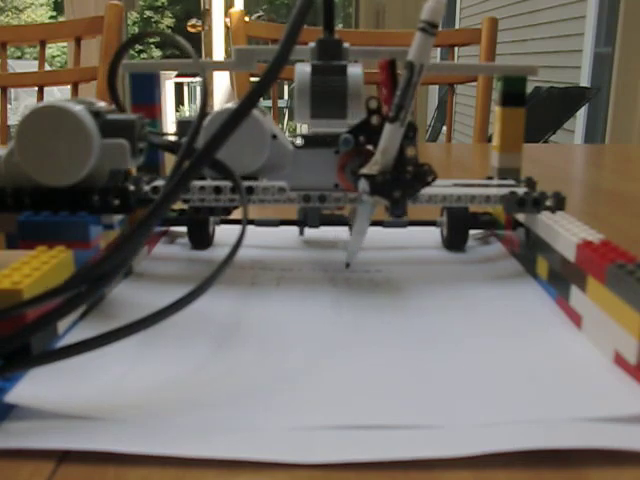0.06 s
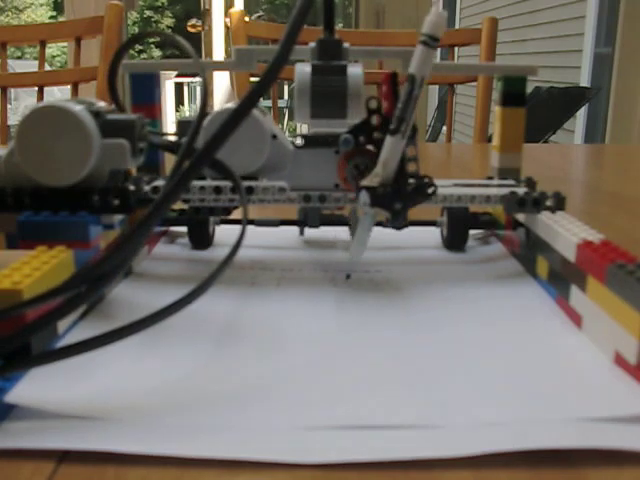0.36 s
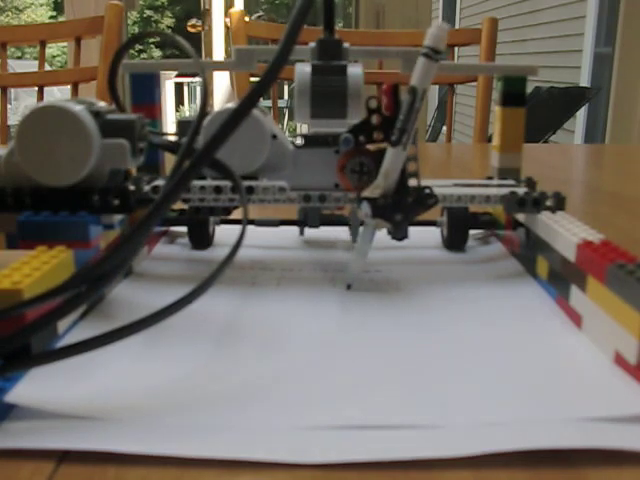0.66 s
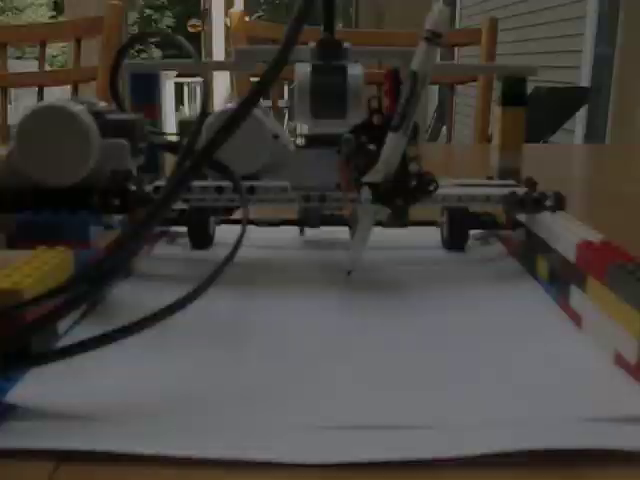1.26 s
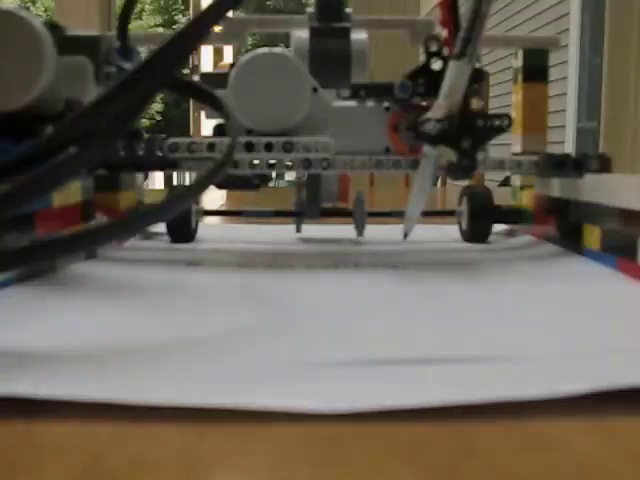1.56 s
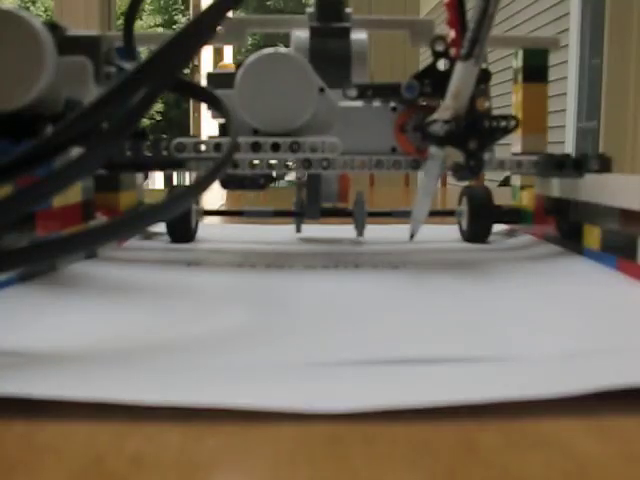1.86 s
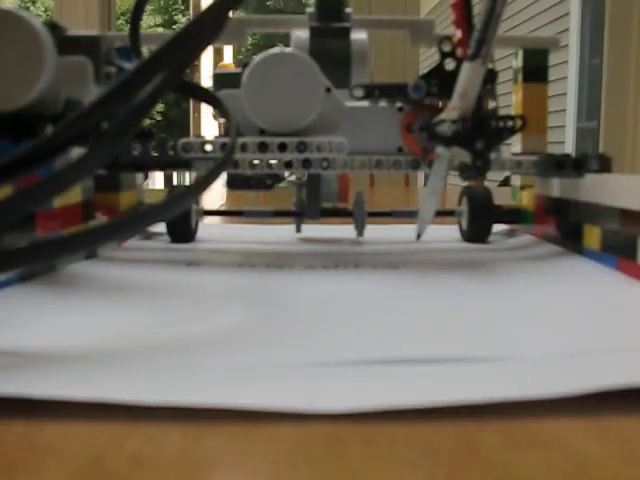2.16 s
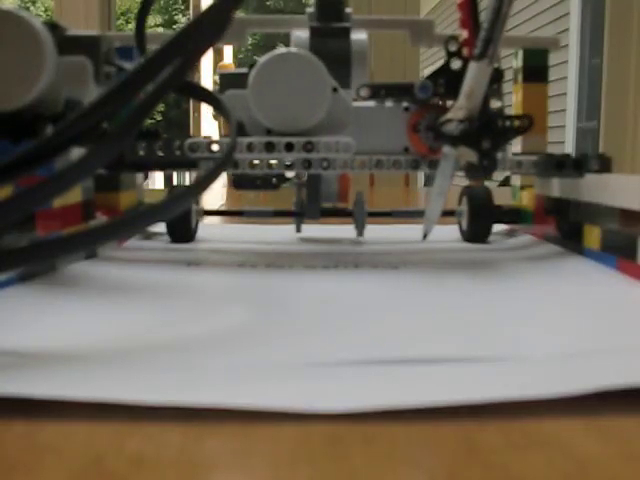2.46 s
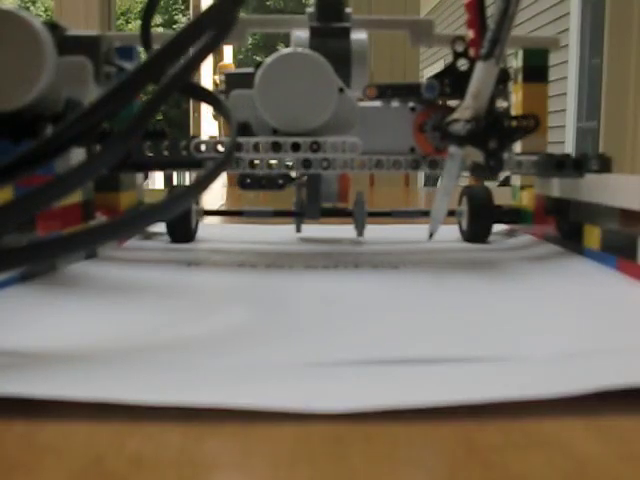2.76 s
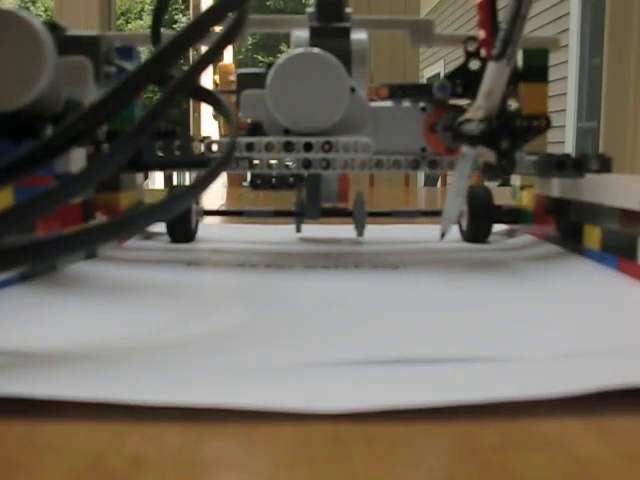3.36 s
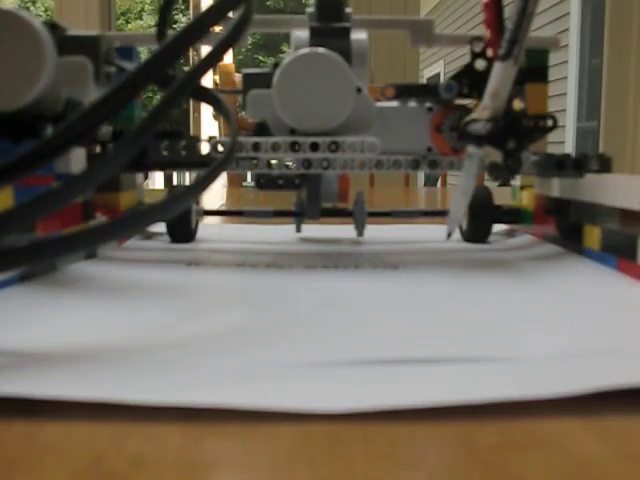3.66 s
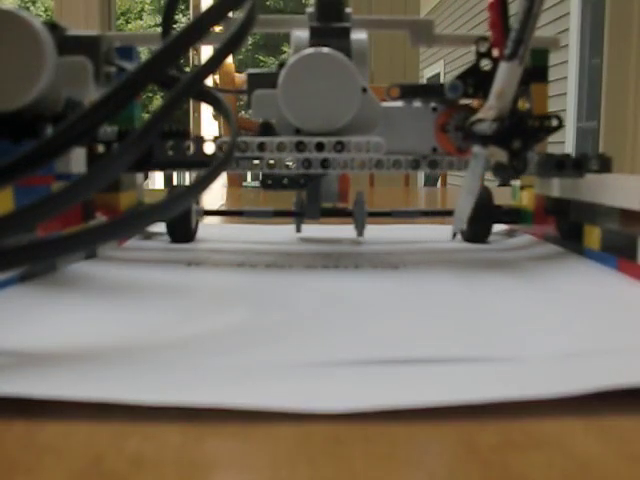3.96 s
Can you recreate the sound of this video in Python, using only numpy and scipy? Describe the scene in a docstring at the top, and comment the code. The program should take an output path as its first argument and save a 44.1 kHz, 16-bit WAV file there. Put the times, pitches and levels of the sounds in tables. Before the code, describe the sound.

Small motors and plastic gears whir and buzz as a toy-brick plotter draws.

```python
"""A toy-brick plotter draws on a wooden table, heard from two close spots with a fade between them.
Its gear teeth tick about 170 times a second and make the plastic frame ring; they rasp where the
gears jam. Underneath, the motors whirr, the table rumbles, the motor's electronics whine and
household machines hum."""
import sys
import numpy as np
from scipy import signal
from scipy.fft import rfft, irfft
from scipy.io import wavfile
from scipy.ndimage import uniform_filter1d

SR = 44100
rng = np.random.default_rng(int(sys.argv[2]) if len(sys.argv) > 2 else 0)


def put_to_file(sound):
    """Save the sound as 16-bit audio at rate SR, in the file named by the first command-line argument."""
    columns = np.atleast_2d(sound).T  # one column per channel
    safe = np.clip(columns, -1, 1)
    whole_steps = np.round(safe * 32767)
    wavfile.write(sys.argv[1], SR, whole_steps.astype(np.int16))


N = 176400
MOVE_S = 1.475  # when we move from the first spot to the second


def undb(db):
    return 10 ** (np.asarray(db) / 20)


def unit(x):
    return x / np.sqrt(np.mean(x ** 2))


def times():
    return np.arange(N) / SR


def curve(rows):
    """Straight lines through (seconds, value) points."""
    return np.interp(times(), *np.array(rows).T)


def drift(rate_hz):
    """A smooth random wander, about 1 in size."""
    step = max(int(SR / rate_hz), 1)
    stairs = np.repeat(rng.standard_normal(N // step + 1), step)
    return unit(uniform_filter1d(stairs, step)[:N])


def noise(colour):
    """Noise shaped by (Hz, dB) points."""
    hz, db = np.array(colour).T
    f = np.maximum(np.fft.rfftfreq(N, 1 / SR), 1)
    gain = undb(np.interp(np.log(f), np.log(hz), db))
    return unit(irfft(rfft(rng.standard_normal(N)) * gain, N))


def ring(hits, notes, size=4096):
    """A struck object rings at its own (Hz, width, dB) notes."""
    f = np.fft.rfftfreq(size, 1 / SR)
    power = sum(undb(db) ** 2 / (1 + ((f - hz) / width) ** 2) ** 2 for hz, width, db in notes)
    # These steps make the ringing follow each hit, never lead it.
    cepstrum = irfft(np.log(power + power.max() * undb(-50) ** 2) / 2)
    cepstrum[1:size // 2] *= 2
    cepstrum[size // 2:] = 0
    ping = irfft(np.exp(rfft(cepstrum)))
    return unit(signal.fftconvolve(hits, ping)[:N])


def tone(hz, drift_hz, waver_db):
    """A tone that wavers a little in pitch and level."""
    cycles = np.cumsum(hz + drift_hz * drift(12)) / SR + rng.random()
    return np.sqrt(2) * np.sin(2 * np.pi * cycles) * undb(waver_db * drift(14))


def household_hum():
    """Mains hum beats against a slightly slower machine, over the room's low drone."""
    # The hum's tones. Each row: pitch in Hz, level in dB.
    tones = [(59.5, -71), (111.7, -53), (120, -58.5), (240, -56.5), (245, -65), (278.5, -61.5),
             (390, -70.5), (432, -66), (599.5, -68)]
    # The drone's colour. Each row: frequency in Hz, relative level in dB.
    drone = [(20, -18), (40, -8.5), (60, 0.5), (80, -2.5), (105, 4), (135, -8), (250, -10.5), (1000, -29)]
    hum = sum(undb(db) * tone(hz, drift_hz=.69, waver_db=2.1) for hz, db in tones)
    return hum + noise(drone) * undb(-56.5)


def electronics_whine():
    """The motor's power switching whines, louder when it works hard; a thin tone sits above."""
    # The whine's loudness. Each row: time in seconds, level in dB.
    level = [(0, -64), (.55, -67), (.65, -56), (.69, -76), (.8, -72), (.85, -60.5), (1.35, -59), (1.5, -67),
             (2.5, -74), (3.93, -80), (3.98, -59)]
    thin = np.sqrt(2) * np.sin(2 * np.pi * 15490 * times()) * undb(-89)
    return tone(8000, drift_hz=7.5, waver_db=1.5) * undb(curve(level)) + thin


def table_rumble():
    """The drive shakes the table and the frame."""
    # The rumble's colour. Each row: frequency in Hz, relative level in dB.
    colour = [(50, -15), (130, -9.5), (170, -1.5), (205, -2), (250, 1), (320, 1), (420, -3.5), (560, -8),
              (900, -16), (2000, -47)]
    # Its loudness. Each row: time in seconds, level in dB.
    level = [(0, -51), (.6, -53.5), (.8, -50.5), (1.1, -50), (1.6, -51), (1.9, -44.5), (2.2, -49),
             (2.7, -51), (3.35, -50), (4, -51)]
    return noise(colour) * undb(curve(level) + drift(20))


def motor_whirr(teeth, colour, db, throb, flutter_db):
    """Motors and gears rub, throbbing with each tooth."""
    pulse = 1 + throb * np.cos(2 * np.pi * teeth)
    return noise(colour) * pulse * undb(db + flutter_db * drift(45))


def wheel_sway(teeth, teeth_per_sway=17.7, peak_s=1.56):
    """An off-centre wheel swings from -1 to 1, swaying speed and tooth pressure."""
    return np.cos(2 * np.pi * (teeth - np.interp(peak_s, times(), teeth)) / teeth_per_sway)


def teeth_passed(wobble):
    """Count the gear teeth going by as the wheel sways the speed."""
    # Motor speed before the sway. Each row: time in seconds, teeth per second.
    speed = [(0, 150), (.08, 155), (.2, 204), (.36, 203), (.48, 194), (.58, 181), (.66, 198), (.69, 135),
             (.74, 190), (.79, 186), (.83, 126), (.92, 163), (1.2, 173), (1.45, 179), (1.5, 160),
             (1.85, 177), (2.07, 184), (2.38, 178), (2.6, 180), (2.85, 157), (3.05, 157), (3.3, 161),
             (3.55, 176), (3.7, 160), (4, 169)]
    rate = curve(speed)
    return np.cumsum(rate * (1 + wobble * wheel_sway(np.cumsum(rate) / SR))) / SR


def tooth_knocks(teeth, scatter_db, turn_db, lobe_db, jitter_s, bounce):
    """Each tooth knocks and bounces; an uneven ten-tooth gear repeats its strong and weak knocks."""
    at = np.flatnonzero(np.diff(np.floor(teeth)))
    strength, timing, bounce_timing, bounce_strength = rng.standard_normal((len(at), 4)).T
    angle = 2 * np.pi * np.arange(len(at)) / 10
    force_db = scatter_db * strength + turn_db * np.sin(angle) + lobe_db * np.sin(3 * angle)
    knock_at = at + (jitter_s * SR * timing).astype(int)
    bounce_at = at + (SR * (.0035 + .0005 * bounce_timing)).astype(int)
    hits = np.zeros(N)
    hits[np.clip(knock_at, 0, N - 1)] = np.tanh(undb(force_db) / 1.5)  # caps the hardest knocks
    hits[np.clip(bounce_at, 0, N - 1)] += bounce * np.tanh(bounce_strength)
    return unit(hits)


def scraped(hits, amount, decay_s):
    """After each knock the tooth slides for a moment."""
    slide = signal.lfilter([1], [1, -np.exp(-1 / (decay_s * SR))], hits) * rng.standard_normal(N)
    return hits + amount * unit(slide)


def jam_rasp(teeth, rise_s=.039, fall_s=.019, sway_db=1):
    """Jamming teeth snap harder and brighter; at the second spot the rasp swells with the wheel."""
    # The jams. Each row: start and end in seconds, level in dB.
    jams = [(.70, 0.741, -49.5), (0.761, 0.79, -41.5), (1.696, 2.03, -46), (2.05, 2.136, -42),
            (2.177, 2.452, -44.5)]
    # The gears' ringing. Each row: pitch in Hz, width in Hz, relative level in dB.
    gear_notes = [(2290, 140, 6), (2546, 80, 4.5), (4780, 1330, -2.5), (5100, 160, -1), (6300, 250, 1.5),
                  (7000, 500, -3.5), (8350, 400, -3), (9420, 400, -4), (10500, 280, -10), (11500, 200, -15),
                  (11940, 300, -16), (14500, 2200, -23)]
    t = times()
    load = sum(undb(db) * np.clip(np.minimum((t - start) / rise_s, (end - t) / fall_s) + 1, 0, 1)
               for start, end, db in jams)
    hits = tooth_knocks(teeth, scatter_db=3, turn_db=2, lobe_db=1.5, jitter_s=.00005, bounce=.08)
    swell = undb(sway_db * wheel_sway(teeth) * (t > MOVE_S))
    return load * swell * ring(scraped(hits, amount=1.9, decay_s=.0019), gear_notes)


def light_drive(teeth, new_load_s=.82):
    """First spot: light ticks ring the whole frame, over the whirr."""
    # The frame's ringing before and after it takes a new load.
    # Each row: pitch in Hz, width in Hz, relative level in dB.
    early_notes = [(960, 230, -15), (1550, 150, -3.5), (1820, 170, 2), (2570, 166, 5), (4170, 190, -2),
                   (4580, 160, 4), (5260, 290, 1.5), (5640, 250, 2), (6710, 420, -1), (7500, 250, -5),
                   (8140, 300, -4), (8900, 340, -2), (10350, 520, -12), (11600, 350, -17),
                   (13150, 450, -15)]
    loaded_notes = [(939.5, 150, -2), (1571, 130, 3), (2620, 120, -2.5), (2900, 240, 1), (4300, 130, 2),
                    (4550, 170, 1.5), (5430, 250, 3), (5860, 180, 1), (6380, 140, -0.5), (7060, 400, -6),
                    (8500, 600, -7), (9900, 490, -11.5), (13250, 250, -17)]
    # Loudness of ticks and whirr. Each row: time in seconds, level in dB.
    tick_level = [(0, -49.5), (.1, -48), (.35, -44), (.65, -48.5), (.72, -49), (.83, -53), (.9, -45.5),
                  (1.05, -46.5), (1.2, -44.5), (1.47, -47)]
    whirr_level = [(0, -48.5), (.15, -44.5), (.65, -45.5), (.85, -47), (1.47, -47.5)]
    # The whirr's colour. Each row: frequency in Hz, relative level in dB.
    colour = [(400, -3.5), (700, 0.5), (1000, -0.5), (1200, -3), (1550, 1), (2000, -4.5), (2600, -2),
              (3400, -5), (4500, -2), (5500, -3), (6200, -10), (7000, -5.5), (9000, -12.5), (11000, -26),
              (15500, -31)]
    hits = tooth_knocks(teeth, scatter_db=4.5, turn_db=-1, lobe_db=-.5, jitter_s=.00005, bounce=.12)
    hits = scraped(hits, amount=.99, decay_s=.002)
    frame = np.where(times() < new_load_s, ring(hits, early_notes), ring(hits, loaded_notes))
    whirr = motor_whirr(teeth, colour, curve(whirr_level), throb=.1, flutter_db=1.5)
    return frame * undb(curve(tick_level)) + whirr


def heavy_drive(teeth):
    """Second spot: heavy ticks ping a hollow beam and, more softly, the frame and its thin panels."""
    # Each part's ringing. Each row: pitch in Hz, width in Hz, relative level in dB.
    beam_notes = [(4250, 190, -2), (4533, 172, 2.5), (4800, 190, -4), (5140, 270, -9)]
    frame_notes = [(950, 160, -7.5), (1710, 190, -2.5), (2500, 220, 3.5), (3370, 300, -0.5),
                   (4800, 566, -3), (5250, 220, 0), (6560, 210, -0.5), (7180, 260, -4.5), (8100, 300, -13),
                   (9070, 530, -11.5), (10560, 340, -13.5), (12200, 300, -19), (13700, 1700, -21)]
    panel_notes = [(945, 42, -2), (1680, 59, 1), (1810, 61, -2), (2385, 48, -4.5), (2544, 58, 3.5),
                   (5560, 43, 0), (6300, 46, -2)]
    # The ticks' loudness. Each row: time in seconds, level in dB.
    tick_level = [(1.47, -36.5), (1.62, -39.5), (1.8, -40.5), (2.2, -42.5), (2.5, -40), (3.3, -39.5),
                  (3.96, -40.5), (3.99, -32)]
    # The whirr's colour. Each row: frequency in Hz, relative level in dB.
    colour = [(400, -5), (700, -1.5), (1000, -1), (1250, -4.5), (1700, 1.5), (2050, -5), (2500, 0.5),
              (3000, -3), (3700, -6.5), (4500, -3), (6000, -8), (7000, -9.5), (8500, -19), (11500, -29),
              (15500, -34)]
    hits = tooth_knocks(teeth, scatter_db=5, turn_db=3.5, lobe_db=4, jitter_s=.00008, bounce=.19)
    beam = ring(scraped(hits, amount=.3, decay_s=.0024), beam_notes)
    frame = ring(scraped(hits, amount=1.9, decay_s=.0014), frame_notes)
    frame *= undb(-8.5 + 3.7 * wheel_sway(teeth))
    panels = ring(scraped(hits, amount=1, decay_s=.0061), panel_notes) * undb(-12.5)
    whirr = motor_whirr(teeth, colour, db=-44.5, throb=.16, flutter_db=1.2)
    return (beam + frame + panels) * undb(curve(tick_level)) + whirr


def plotter(stall_s=3.968, stall_length_s=.0202, stall_db=-14):
    """The gears from each spot in turn, dipping in one brief stall, over the table's rumble."""
    t = times()
    second_spot = t > MOVE_S
    teeth = teeth_passed(wobble=np.where(second_spot, .03, .005))
    stalled = uniform_filter1d(1. * ((t > stall_s) & (t < stall_s + stall_length_s)), size=100)
    drive = np.where(second_spot, heavy_drive(teeth), light_drive(teeth)) + jam_rasp(teeth)
    return drive * undb(stall_db * stalled) + table_rumble()


def room(sound, echo_s=.08, echo_db=-15):
    """Add short echoes from the table and nearby walls."""
    t = times()[:SR // 2]
    tail = rng.standard_normal(len(t)) * undb(-60 * t / echo_s) * (t > .002)
    return sound + undb(echo_db) * signal.fftconvolve(sound, tail / np.linalg.norm(tail))[:N]


def scene():
    return (room(plotter()) + electronics_whine() + household_hum())[None]


def record(dry, fade_out_s=.22, fade_in_s=.24, notch_hz=7715, notch_depth=.75, top_hz=15800):
    """The microphone dulls one narrow band; the sound fades between spots and loses its top treble."""
    t = times()
    fade = np.clip(np.maximum((MOVE_S - t) / fade_out_s, (t - MOVE_S) / fade_in_s), 0, 1)
    notched = signal.lfilter(*signal.iirnotch(notch_hz, Q=22, fs=SR), dry)
    heard = (dry + notch_depth * (notched - dry)) * fade
    return signal.sosfilt(signal.ellip(10, .2, 70, top_hz, fs=SR, output="sos"), heard)


dry = scene()
out = record(dry)
put_to_file(out)
```